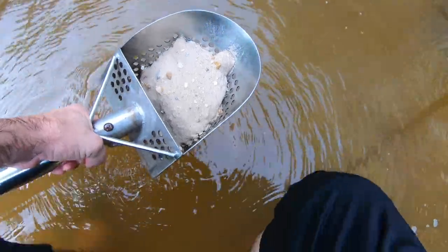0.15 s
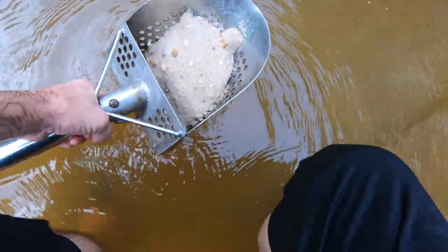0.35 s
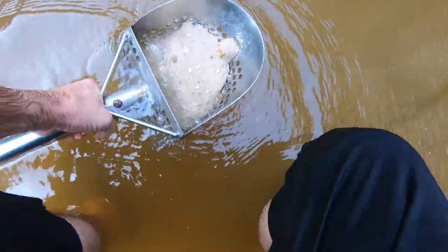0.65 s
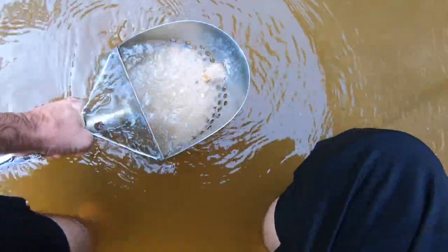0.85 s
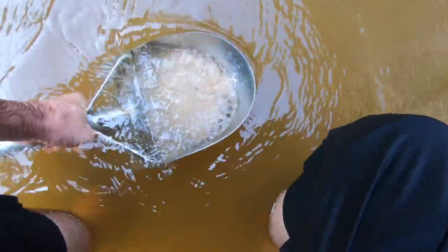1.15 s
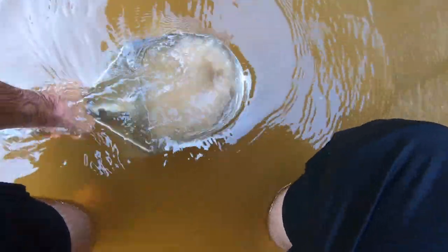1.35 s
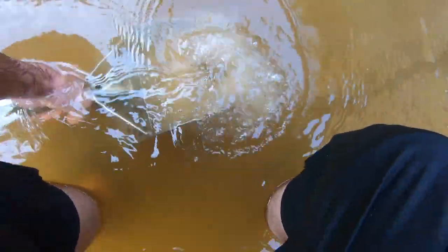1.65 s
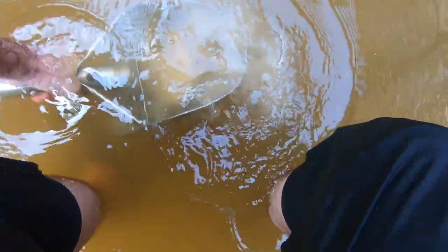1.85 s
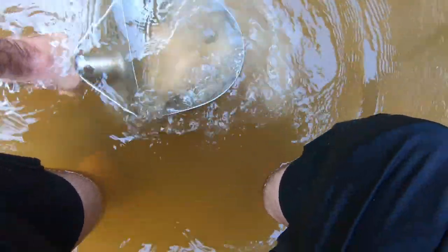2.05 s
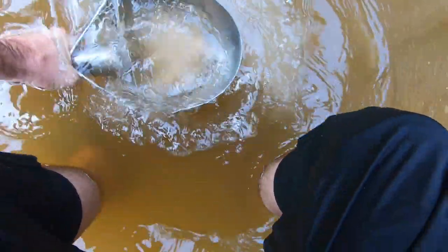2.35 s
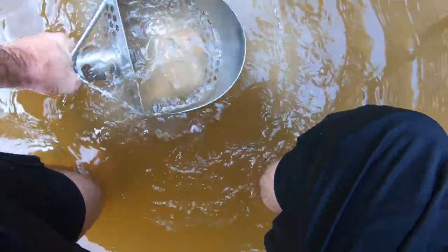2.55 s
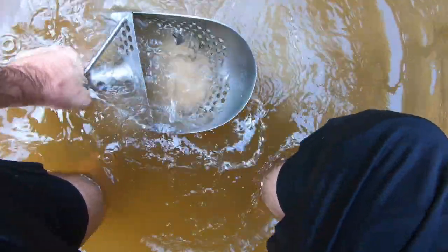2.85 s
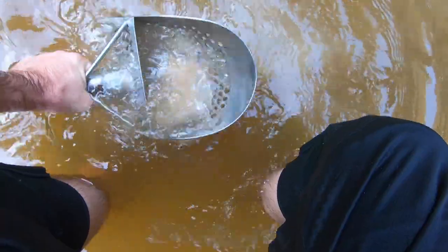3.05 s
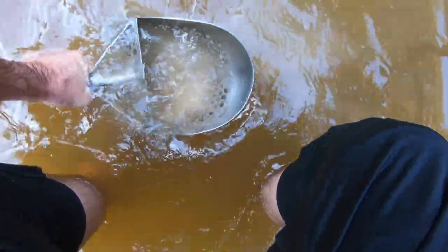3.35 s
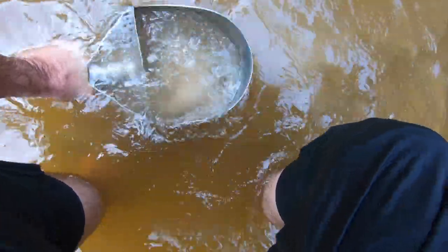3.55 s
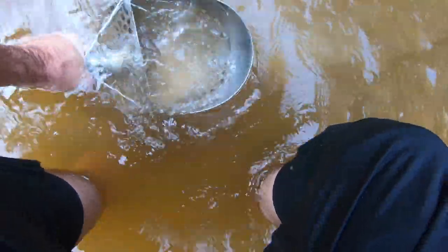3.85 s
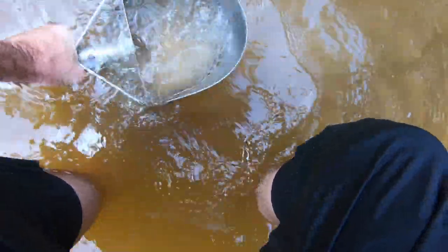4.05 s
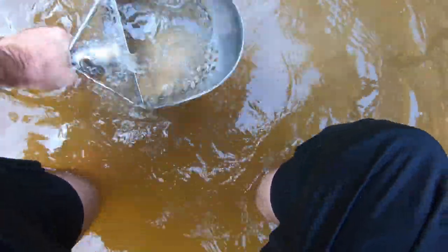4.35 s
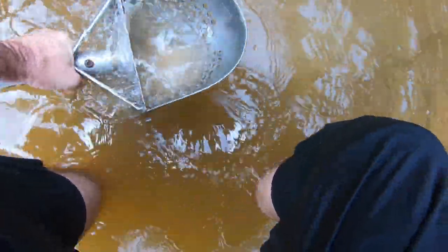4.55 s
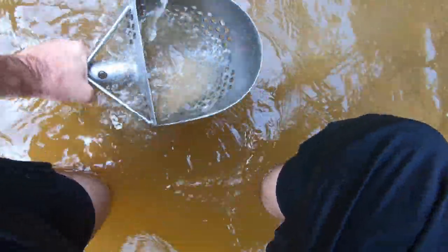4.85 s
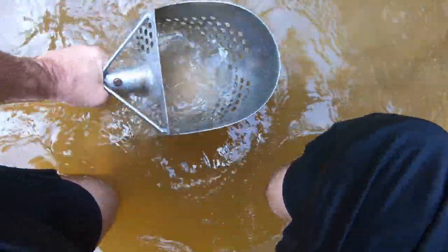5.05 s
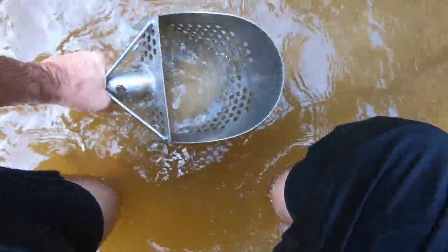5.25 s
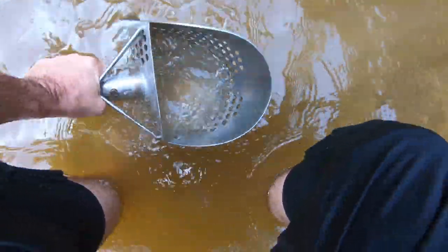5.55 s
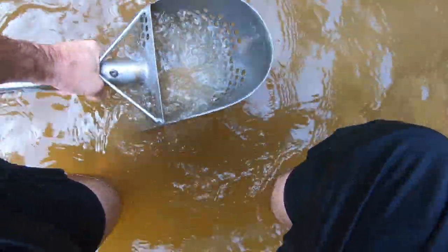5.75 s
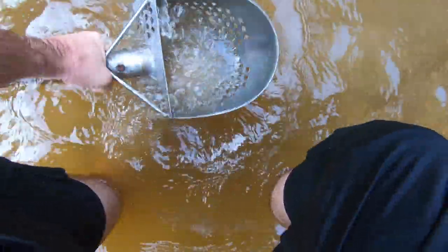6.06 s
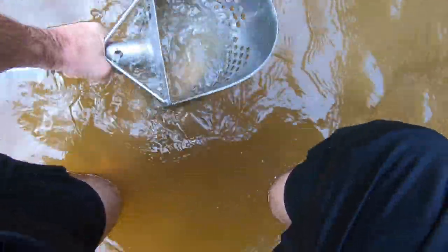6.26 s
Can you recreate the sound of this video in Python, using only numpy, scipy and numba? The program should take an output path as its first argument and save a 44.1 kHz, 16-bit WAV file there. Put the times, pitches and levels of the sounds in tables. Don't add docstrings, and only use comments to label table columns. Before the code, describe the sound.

A metal scoop of sand drips, dunks with a hollow glug, then is shaken in water with gritty, sloshing, ringing strokes outdoors.

```python
import sys
import numpy as np
from scipy import signal
from scipy.fft import rfft, irfft
from scipy.io import wavfile
from numba import njit

SR = 44100
rng = np.random.default_rng(int(sys.argv[2]) if len(sys.argv) > 2 else 0)


def invert_db(level):
    return 10 ** (np.asarray(level, dtype=float) / 20)


def generate_wav(signal):
    frames = np.transpose(np.atleast_2d(signal))
    scaled = np.clip(frames, -1, 1) * 32767
    pcm = np.round(scaled).astype(np.int16)
    wavfile.write(sys.argv[1], SR, pcm)


N = 283122
HZ = np.arange(N // 2 + 1) * SR / N
TIME_S = np.arange(N) / SR


def along(table):
    hz, value = np.transpose(table)
    return np.interp(np.log(HZ + 1), np.log(hz + 1), value)


def colour(x, gain):
    cepstrum = irfft(np.log(gain + 1e-4), N)
    cepstrum[1:N // 2] *= 2
    cepstrum[N // 2 + 1:] = 0
    y = irfft(rfft(x) * np.exp(rfft(cepstrum)), N)
    return y / y.std()


def wander(rate, count):
    knots = rng.standard_normal(count)
    place = np.arange(count)
    return np.interp(TIME_S * rate, place, knots), np.interp(TIME_S * rate, place, knots[::-1])


def clumps():
    return invert_db(3 * wander(45, 1000)[0])


def grains(rate, spread_db, smooth):
    chance = rng.random((3, N))
    size_db = spread_db * np.minimum(-np.log(chance[1] + 1e-9), 4)
    taps = (chance[0] < rate / SR) * invert_db(size_db) * np.sign(chance[2] - 0.5)
    smooth = np.clip(smooth, 0, 1)
    return np.sqrt(1 - smooth) * taps / taps.std() + np.sqrt(smooth) * rng.standard_normal(N)


@njit
def ring(start, size, hz, t60, glide, swell):
    out = np.zeros(N)
    for k in range(len(start)):
        phase, f, a, lack = 0., hz[k], size[k], 1.
        fall = 1000 ** (-1 / (t60[k] * SR))
        rise = 2 ** (glide[k] / SR)
        for i in range(start[k], min(N, start[k] + int(t60[k] * SR))):
            out[i] += a * (1 - lack) * np.sin(phase)
            phase += 2 * np.pi * f / SR
            f = min(f * rise, 16000.)
            a *= fall
            lack *= swell
    return out


def bubbles(start_s, peak_db, pitch_hz, ring_s, glide, swell_s=0.00015):
    swell = np.exp(-1 / (swell_s * SR))
    return ring((start_s * SR).astype(int), invert_db(peak_db), pitch_hz, np.clip(ring_s, 0.002, 0.2), glide, swell)


def tone(table):
    s, hz, db = np.transpose(table)
    fade = np.clip(np.minimum(TIME_S - s[0], s[-1] - TIME_S) / 0.004, 0, 1)
    phase = 2 * np.pi * np.cumsum(np.interp(TIME_S, s, hz)) / SR
    return np.sqrt(2) * fade * invert_db(np.interp(TIME_S, s, db)) * np.sin(phase)


def deep_cut():
    return 1 / (1 + (152.5 / (HZ + 1)) ** 9)


# pitch_hz, density_db (per Hz)
AIR = [(65, -26), (110, 1.5), (223, -14), (1060, -17.5), (1390, -10), (1510, -20.5), (9050, -27),
       (15900, -76)]


def open_air():
    air_db = -61
    air_gain = invert_db(along(AIR)) * deep_cut()
    return invert_db(air_db) * np.array([colour(rng.standard_normal(N), air_gain) for _ in range(2)])


def self_noise():
    hum_db = -80
    hum_gain = 1 / (1 + (HZ / 90) ** 3)
    return invert_db(hum_db) * np.array([colour(rng.standard_normal(N), hum_gain) for _ in range(2)])


# start_s, level_db
BREEZE_GUSTS = [(0, -65), (.2, -63), (0.418, -65), (.56, -49), (.76, -54.5), (.85, -68.5), (1.9, -69),
                (3.1, -59), (4.2, -83), (5.4, -62), (6.42, -100)]


def breeze():
    s, db = np.transpose(BREEZE_GUSTS)
    rumble = colour(grains(60, 3.0, 0.13), 1 / (1 + ((HZ - 175) / 60) ** 2))
    return invert_db(np.interp(TIME_S, s, db)) * rumble


# start_s, pitch_hz, level_db
BIRD_CALLS = [
    [(.025, 3100, -48), (.048, 2880, -47), (.08, 3450, -41), (.092, 3140, -56), (.11, 2580, -51),
     (.124, 2580, -50), (.15, 2090, -50)],
    [(.308, 2370, -48), (.325, 2404, -57), (.345, 2300, -57)],
    [(.472, 2405, -49), (.49, 3090, -53), (.505, 3630, -52), (.52, 2950, -51), (.54, 2610, -49),
     (.558, 2770, -56)],
    [(.655, 2350, -52), (.685, 2420, -51)],
    [(.71, 2680, -41), (.73, 3070, -58), (.745, 2800, -58)],
]


def bird():
    echo_s, echo_db = 0.064, -3.5
    t = np.arange(SR // 2) / SR
    tail = rng.standard_normal(len(t)) * np.exp(-t / echo_s)
    tail /= np.sqrt(np.sum(tail ** 2))
    call = sum(tone(whistle) for whistle in BIRD_CALLS) * np.sqrt(clumps())
    return call + invert_db(echo_db) * signal.fftconvolve(call, tail)[:N]


# pitch_hz, density_db (per Hz)
STEEL = [(760, -24), (1300, -10), (1620, -1.5), (1860, -5), (2910, -3.5), (3980, -6.5), (8120, -9.5),
         (9400, -8), (11500, -24.5), (14300, -29), (15100, -30), (15900, -52)]


def steel_colour():
    return invert_db(along(STEEL))


def strike(start_s, peak_db, crack_db, knock_db):
    out = np.zeros(N)
    for rel_db, tilt, fade_s in [(crack_db + 8.5, 2.2, 0.0025), (knock_db, 0, 0.0043)]:
        blows = np.zeros(N)
        blows[(start_s * SR).astype(int)] = invert_db(peak_db + rel_db)
        burst = signal.lfilter([1], [1, -np.exp(-1 / (fade_s * SR))], blows)
        out += burst * colour(rng.standard_normal(N), steel_colour() * (HZ / 4000) ** tilt)
    return out


# start_s, peak_db, pitch_hz
TICKS = [(0.1785, -39, 4280), (0.2828, -34, 4670), (0.3755, -38, 5100), (0.4594, -44, 4120),
         (0.52, -28.5, 6300), (0.825, -33, 6380), (1.32, -36, 8500), (1.378, -34, 6400),
         (1.6018, -43, 7000), (1.632, -38, 7300), (1.734, -48, 4230), (1.8557, -53, 4220),
         (2.06, -37, 4270), (2.1244, -31, 4230), (2.2153, -29, 4800), (2.3294, -25, 4100),
         (2.5194, -25, 4300), (2.6549, -43, 4820), (2.675, -22.5, 6790), (2.689, -21.5, 4670),
         (2.73, -35, 4040), (2.9093, -24.5, 4430), (2.992, -29, 8350), (3.028, -33, 6740),
         (3.059, -21, 4850), (3.3044, -38, 4960), (3.421, -35, 9500), (3.533, -36, 11000),
         (3.713, -24, 6940), (3.7285, -25, 5000), (3.8596, -24, 4500), (3.9868, -23, 4500),
         (4.003, -22, 4770), (4.1954, -40, 4310), (4.2094, -44, 4800), (4.4398, -24, 4800),
         (5.728, -25, 4600), (5.8267, -28, 4640), (5.8644, -20, 4420), (5.888, -21, 4280),
         (5.9284, -18.5, 6400), (6.0531, -24, 5220), (6.2936, -38, 4730)]


def spray_ticks():
    s, db, hz = np.transpose(TICKS)
    db = db - 1.5
    level = np.ones(len(s))
    return bubbles(s, db, hz, 51 / hz, 0 * level) + strike(s, db, -23 * level, -60 * level)


# start_s, peak_db, pitch_hz, crack_db
DRIPS = [(0.283, -33.5, 3020, -22), (0.3205, -33, 2320, -19.5), (0.636, -24.5, 2880, -17),
         (0.7415, -27, 2600, -27), (0.7875, -26.5, 2900, -48), (0.8121, -25, 3020, -36),
         (0.8488, -31, 3120, -25), (1.4847, -23.5, 2690, -23.5), (1.505, -28, 1850, -21.5),
         (1.511, -29.5, 2720, -27), (1.5516, -31.5, 3270, -44)]
# start_s, peak_db, pitch_hz, crack_db
STONES = [(2.0752, -23, 2900, -31), (2.18, -20.5, 2540, -44), (2.347, -28.5, 2920, -18),
          (2.5049, -24.5, 1710, -18.5), (2.6808, -20.5, 3100, -27), (3.19, -18.5, 3290, -14),
          (3.2032, -21, 2940, -17.5), (3.276, -24, 1460, -51), (3.49, -21, 2650, -23.5),
          (3.561, -25.5, 6000, -27), (3.6252, -21.5, 2360, -46), (3.702, -32.5, 3040, -6.5),
          (3.7164, -20.5, 2470, -35), (3.792, -20, 2660, -38), (4.095, -26, 3110, -21),
          (4.312, -25, 2050, -19), (4.3856, -16.5, 3150, -51), (4.6339, -18.5, 2280, -22),
          (4.924, -20, 3220, -24), (5.16, -26, 2960, -19.5), (5.2737, -16.5, 2990, -35),
          (5.358, -21.5, 3300, -21), (5.4056, -22, 3000, -31), (5.436, -26, 3030, -23),
          (5.571, -26.5, 3320, -49), (5.678, -19, 2050, -38), (5.849, -19, 1460, -26),
          (5.873, -26, 2770, -28), (6.1815, -12, 2880, -24.5), (6.4103, -15.5, 3040, -41)]
# start_s, peak_db, pitch_hz, crack_db
PEBBLES = [(0.2307, -29, 2720, -37), (0.9386, -29.5, 2520, -36), (1.701, -39, 1850, -20),
           (2.169, -23.5, 1570, -29), (2.208, -23.5, 2200, -26), (2.241, -31, 2580, -21),
           (2.415, -29, 3080, -21), (2.6707, -32, 3100, -30), (2.8826, -19.5, 3700, -29),
           (3.034, -25.5, 1980, -45), (3.055, -20.5, 3140, -24), (3.0915, -16.5, 2500, -23),
           (3.218, -25, 3150, -13), (3.2425, -23, 3030, -32), (3.455, -32, 3230, -25),
           (3.7282, -17.5, 2400, -25), (3.8598, -24, 3120, -17), (3.9555, -22, 2750, -42),
           (3.988, -26, 2950, -17), (4.0795, -25, 1770, -32), (4.197, -30, 1580, -38),
           (4.2348, -32, 3270, -35), (4.442, -25, 2630, -28), (4.5261, -30, 2800, -25),
           (4.6584, -23, 2750, -24), (4.779, -19, 2480, -42), (4.8027, -15.5, 2850, -40),
           (5.0597, -25, 3060, -23), (5.0705, -20, 2700, -38), (5.2999, -32, 3060, -30),
           (5.6, -24, 3070, -22), (5.6364, -18, 2980, -24), (5.6674, -22, 2070, -25),
           (5.7889, -20, 3360, -15), (5.826, -16.5, 2900, -32), (5.887, -32, 2860, -25),
           (5.915, -21, 2760, -14), (5.9936, -21, 2520, -20), (6.0674, -32, 2830, -25),
           (6.1215, -25, 2780, -22), (6.3398, -20.5, 2880, -12.5)]


def drops_and_stones():
    s, db, hz, crack_db = np.transpose(DRIPS + STONES + PEBBLES)
    item = np.arange(len(s))
    db = db - 4.5 * (item >= len(DRIPS + STONES))
    cycles = np.where(item < len(DRIPS), 61, 50)
    knock_db = 6 + 0.63 * crack_db
    return bubbles(s, db, hz, cycles / hz, np.full(len(s), 5.)) + strike(s, db, crack_db, knock_db)


# start_s, peak_db, pitch_hz, ring_s, glide (octaves a
BUBBLES = [(.227, -32.5, 794, 0.073, 38), (.607, -41.5, 3050, 0.027, -10), (.615, -24.5, 2150, 0.02, -17),
           (0.637, -16.5, 900, 0.036, -10.5), (.7, -37, 880, 0.076, -4), (.675, -40, 850, .04, -4),
           (.8, -37, 1510, .05, -4), (.92, -52, 870, 0.12, 7), (1.45, -45, 820, .04, -6),
           (1.605, -45, 710, 0.099, 11), (1.911, -32.5, 327, .04, -8), (1.936, -43, 328, 0.042, 0),
           (1.95, -47, 900, 0.091, -2), (0.735, -12.5, 5500, 0.0081, 2), (1.09, -44, 1390, 0.1, 59),
           (1.343, -20, 2210, 0.013, -22), (1.358, -39.5, 1735, 0.079, -22), (1.364, -35, 934, 0.094, -6),
           (1.421, -37, 3530, .02, 4), (1.434, -31, 3400, 0.033, -24), (1.443, -26.5, 2140, 0.033, -20),
           (1.454, -15, 1730, 0.024, -10), (1.462, -26, 8000, 0.013, 0), (1.49, -6, 1660, 0.012, -9),
           (1.63, -37.5, 3320, 0.019, -24), (1.705, -38, 3770, 0.026, 32), (1.895, -40, 350, 0.056, -1),
           (1.976, -24, 1126, 0.04, 89), (1.978, -21.5, 2340, 0.031, -51), (1.997, -40.5, 686, 0.075, 13),
           (2.045, -35.5, 718, 0.23, -2.5), (2.06, -31, 890, 0.092, 2), (2.09, -30.5, 613, 0.19, -0.5),
            (2.13, -24, 900, 0.041, -3), (2.099, -25, 880, 0.11, 1), (2.108, -20.5, 1210, 0.052, 18),
            (2.131, -26.5, 1900, 0.035, 114), (2.164, -21.5, 513, 0.092, 11.5),
            (2.168, -17, 1384, 0.04, 40), (2.205, -24, 770, 0.029, 14), (2.06, -36, 288, 0.23, -0.5),
            (2.35, -25, 857, 0.081, 7.5), (2.576, -29, 1300, 0.073, -2), (2.649, -32, 974, 0.038, 7),
            (2.82, -27.5, 1346, 0.23, -2), (3.091, -23, 1330, .05, -6), (3.1, -26, 1566, .06, 3),
            (3.285, -38, 1740, 0.045, 38), (3.843, -29.5, 1300, 0.17, -1.5), (4.135, -38, 868, 0.11, 1),
            (5.93, -29.5, 1664, 0.18, 0.5), (5.87, -29, 2900, 0.069, -1), (2.25, -28.5, 448, 0.14, 9),
            (2.519, -22, 1530, .03, -8), (2.629, -16, 2610, 0.017, -10), (2.863, -19.5, 1774, 0.04, 33),
            (2.872, -25, 2160, 0.028, -2), (5.875, -20, 2440, 0.028, -15), (5.99, -24, 2537, 0.12, 3),
            (6.34, -26, 2830, 0.075, 0), (6.278, -24.5, 2906, 0.099, 0.3), (5.325, -28.5, 2900, 0.17, 0.1),
            (3.393, -24, 926, 0.057, 8), (3.795, -25, 1026, 0.046, 1), (3.839, -14, 930, 0.025, 22),
            (3.578, -17.5, 2980, 0.02, -16), (3.89, -32.5, 802, 0.24, 2.5), (4.03, -18, 1300, 0.051, -0.5),
            (4.885, -36.5, 700, 0.24, 14), (5.14, -9.5, 1920, 0.011, 0), (5.701, -20.5, 1630, 0.046, 4.5),
            (5.962, -24.5, 880, 0.066, 29.5), (6.025, -23, 1562, 0.059, 6)]


def single_bubbles():
    return bubbles(*np.transpose(BUBBLES), swell_s=0.0032)


# start_s, pitch_hz, level_db
GLUG = [
    (1.511, 355, -61),
    (1.516, 350, -15.5),
    (1.56, 310, -31.5),
    (1.61, 327.5, -43.5),
    (1.625, 302, -36),
    (1.65, 407, -34),
    (1.69, 470, -49),
    (1.74, 597, -53.5),
    (1.755, 720, -77),
]
# start_s, pitch_hz, level_db
TWIN = [
    (1.612, 412, -65),
    (1.622, 416, -45),
    (1.65, 495.5, -44),
    (1.675, 616, -42),
    (1.699, 920, -54),
    (1.726, 1520, -61),
]
# start_s, pitch_hz, level_db
THIRD = [
    (1.679, 623, -37),
    (1.7, 638, -55),
    (1.739, 880, -50.5),
    (1.75, 900, -75),
]


def glug():
    return sum(tone(part) for part in [GLUG, TWIN, THIRD])


# start_s, flow_db, lapping_db (re flow)
DRAINING = [(0, -52.5, -12.5), (0.3, -50, -9.5), (0.68, -48.5, -10), (0.9, -53, -24), (1.15, -61, -29),
            (1.25, -58, 1), (1.398, -53.5, -41), (1.56, -61, -4), (1.84, -65.5, -6), (1.91, -58, -9),
            (2.03, -55, -8), (2.146, -49, 7.5), (2.396, -49.5, -4.5), (3.2, -48, -9), (3.6, -58, -20),
            (3.83, -47.5, -3), (5.45, -44.5, -14.5), (5.533, -62, -30), (5.72, -37, -7.5),
            (5.86, -36.5, -14), (6.08, -38.5, -11), (6.235, -38, -32), (6.3, -36.5, -15.5),
            (6.42, -34, -17)]


def draining():
    s, flow_db, lap_db = np.transpose(DRAINING)
    spray_db = -3.5 - 0.087 * (flow_db + 50)
    parts_db = [0, lap_db, 0.62 * lap_db, spray_db]
    return np.array([invert_db(np.interp(TIME_S, s, flow_db + db)) ** 2 for db in parts_db])


def add_strokes(power, bout, end_s, shell_db, squaring):
    lean, overlap, gurgle_db, gurgle_s = 0.81, 1.075, 5, 0.51
    narrowing = np.array([[1], [1.4], [1.1], [1]])
    lengths_s = overlap * np.diff([row[0] for row in bout] + [end_s])
    for (start, grit_db, slosh_db, spray_db), length in zip(bout, lengths_s):
        now = (TIME_S > start) & (TIME_S < start + length)
        sharpness = 1.77 - squaring * np.clip(start - 3.9, 0, 1)
        arch = np.sin(np.pi * ((TIME_S[now] - start) / length) ** lean) ** (sharpness * narrowing)
        gurgle = gurgle_db * np.exp((bout[0][0] - start) / gurgle_s)
        parts_db = grit_db + np.array([0, slosh_db, shell_db + gurgle, spray_db])
        power[:, now] += (invert_db(parts_db)[:, None] * arch) ** 2


# start_s, grit_db, slosh_db (re grit),
# spray_db (re grit)
STROKES = [(2.023, -41.5, -8, -9.5), (2.144, -43, 2, -14), (2.283, -38, -0.5, -6.5), (2.4, -39.5, 4, -4.5),
           (2.535, -39.5, 3, -7), (2.656, -41, -4, -0.5), (2.766, -36, -2, -2), (2.892, -36, 1, -5),
           (3.041, -34, -4, -7), (3.172, -38.5, 4.5, -5.5), (3.289, -38.5, -4, -3), (3.422, -42, 7, -3.5),
           (3.535, -42, -0.5, -5.5), (3.657, -39.5, 1, -6), (3.814, -35, -9, -8), (3.934, -35, 0, -8),
           (4.065, -47.5, -0.5, -4), (4.206, -39.5, 0, -4), (4.384, -33, -10, -5), (4.511, -30, -3, -5),
           (4.641, -36, -10.5, -3.5), (4.786, -32.5, -6, -7), (4.911, -34.5, -10, -2.5),
           (5.041, -34.5, -3, -5.5), (5.146, -39, -7.5, -2), (5.294, -38.5, -1.5, -2.5),
           (5.391, -36.5, -22, -7)]
# start_s, grit_db, slosh_db (re grit), spray_db (re grit)
RINSING = [
    (5.556, -40.5, -7, -1.5),
    (5.692, -37.5, 1, -11),
    (5.846, -56, -19, 5),
    (5.93, -42, -18, 6.5),
    (6.0, -55.5, -20, 13.5),
    (6.09, -33, -7.5, -6),
    (6.248, -46, -4, 8),
    (6.36, -40.5, -24, -1),
]


def effort():
    power = draining()
    add_strokes(power, STROKES, 5.1, -6.5, squaring=0.84)
    add_strokes(power, RINSING, 6.44, -7.5, squaring=0)
    return np.sqrt(power)


# pitch_hz, width_hz, waver_share, level_db (re grit), full_db (lower while full)
SINGING = [
    (2900, 100, .025, -2, 12),
    (1615, 90, .02, 0.5, 15),
    (2580, 84, 0.037, -17, 20),
    (891, 53, 0.03, -23.5, -4),
]


def singing(grit):
    out = 0
    for hz, width_hz, waver, db, full_db in SINGING:
        drift, flicker = wander(14, 300)
        pitch = hz * (1 + waver * drift)
        push = grains(400, 1.6, 0.85) + 1j * grains(400, 6.1, 0.52)
        slow = signal.lfilter([1], [1, -np.exp(-np.pi * width_hz / SR)], push)
        ringing = np.real(slow * np.exp(2j * np.pi * np.cumsum(pitch) / SR))
        level_db = db - full_db * (2 - TIME_S * SR / N)
        out = out + invert_db(level_db + 4.5 * flicker) * ringing / ringing.std()
    return grit * out


def swarm(centre_hz, spread, rate, cycles, db):
    chance = rng.random((4000, 5))[:int(rate * N / SR)].T
    hz = centre_hz * 2 ** (spread * (chance[1] + chance[2] - 1))
    glide = 0.012 * spread * hz * chance[4] ** 2
    x = bubbles(chance[0] * N / SR, 14 * chance[3] ** 2, hz, cycles / hz, glide)
    return invert_db(db) * x / x.std()


# pitch_hz, width_hz, level_db (over the broad colour)
PLATE = [(880, 96, 8.5), (1300, 110, 5.5), (1550, 360, 7), (2950, 610, 4), (2880, 18, -3), (6540, 65, 6),
         (7400, 150, 4), (8300, 77, -2)]


def plate_modes():
    return 1 + sum((invert_db(db) - 1) / (1 + (2 * (HZ - hz) / width) ** 2) for hz, width, db in PLATE)


# pitch_hz, density_db (per Hz)
HOLLOW = [(65, -74), (110, -19), (151, -26), (228, -22), (382, 3), (674, -20), (855, -8.5), (1100, -9.5),
          (1820, -6), (2600, 13.5), (3380, 14), (5720, -120)]
# low_hz, high_hz, rate (a second), spread_db, smooth_share (0-1)
LAYERS = [
    (1950, 4280, 3000, 3, 0.39),
    (60, 723, 300, 0, 0.39),
    (530, 1480, 1000, 0.5, 0.48),
    (4300, 35000, 1700, 3, 0.27),
]
# centre_hz, spread (octaves), rate (a second), ring (cycles), level_db (re its layer)
SWARMS = [
    (2756, 0.61, 260, 41, -7),
    (1257, 0.834, 140, 88, -4),
    (6380, 0.93, 600, 49, -4.5),
    (2880, 0.12, 65, 120, -18.5),
    (5630, 0.92, 17, 13, -16),
    (2085, 0.62, 45, 83, -13),
]


def shaking(levels):
    grit, _, shell, spray = levels
    emptied = np.clip((TIME_S - 2.5) / 4.94, 0, 1)
    bared = grit * invert_db(26 * (emptied - 0.5))
    drives = [grit, shell, spray, bared, spray, grit]
    out = sum(level * swarm(*row) for level, row in zip(drives, SWARMS))
    for (lo, hi, *grain), level, body in zip(LAYERS, levels, [STEEL, HOLLOW, HOLLOW, STEEL]):
        band = 1 / np.sqrt((1 + (lo / (HZ + 1)) ** 12) * (1 + (HZ / hi) ** 12))
        taps = grains(*grain)
        if hi < 1000:
            full = colour(taps, band * invert_db(along(np.array(body) * [0.95, 1])))
            higher = colour(taps, band * invert_db(along(np.array(body) * [1.163, 1])))
            layer = (1 - emptied) * full + emptied * higher
        else:
            layer = colour(taps, band * invert_db(along(body)) * plate_modes())
        out = out + level * clumps() * layer
    return out


# pitch_hz, lag (radians, left leads)
LAG = [(1, -3), (780, .5), (1290, 2), (1640, 7.5), (2580, 6.5), (5680, 7), (9900, 8), (15600, 7)]
# pitch_hz, tilt_db (left minus right)
TILT = [(200, 0), (700, -2), (1290, 3.5), (2380, 0), (4400, 2), (8100, -2), (15000, 0.5)]
# pitch_hz, level_db
SPREAD = [(60, 3.5), (200, -25), (700, -17), (1400, 4.5), (3000, -22), (6000, -2), (15000, 1.5)]


def two_ports(near, other, single):
    spread = invert_db(along(SPREAD))
    alike = rfft(near) / np.sqrt(1 + spread ** 2) + rfft(single)
    unlike = rfft(other) * spread / np.sqrt(1 + spread ** 2)
    port = invert_db(along(TILT) / 2) * np.exp(0.5j * along(LAG))
    left = (alike + unlike) * port
    right = (alike - unlike) / port
    return irfft([left * deep_cut(), right * deep_cut()], N)


def scene():
    levels = effort()
    single = breeze() + bird() + spray_ticks() + drops_and_stones() + single_bubbles() + glug()
    single = single + singing(levels[0])
    return open_air() + self_noise() + two_ports(shaking(levels), shaking(levels), single)


def roll_off(x):
    return signal.sosfilt(signal.butter(12, 16010, fs=SR, output="sos"), x)


def record(dry):
    return roll_off(dry)


dry = scene()
out = record(dry)
generate_wav(out)
```